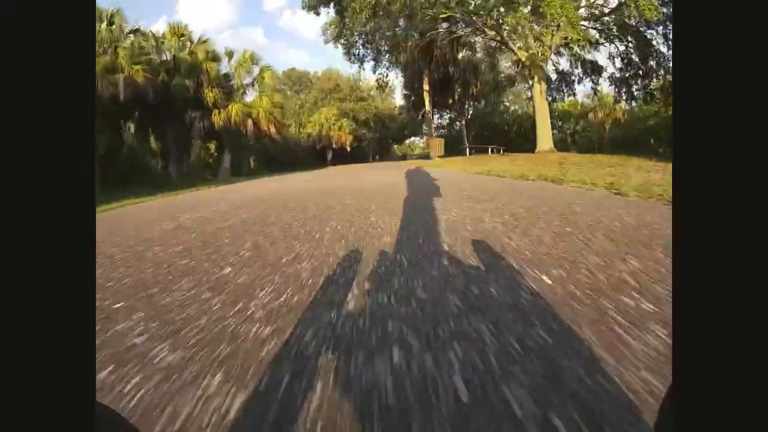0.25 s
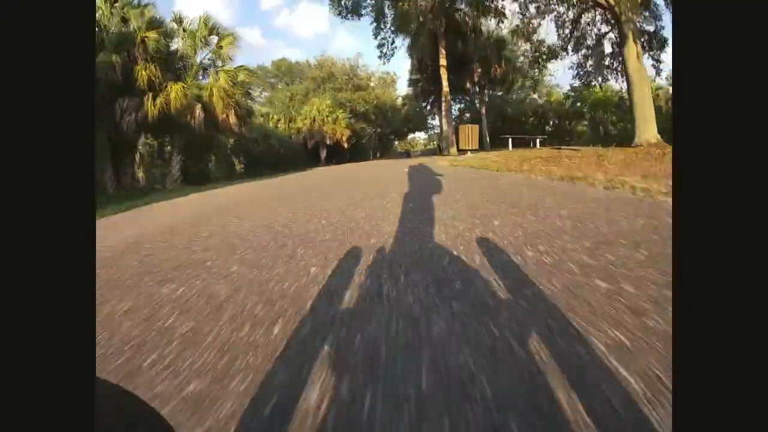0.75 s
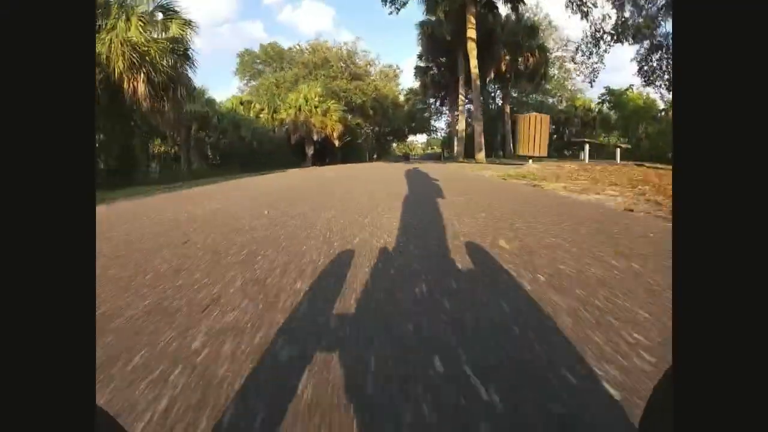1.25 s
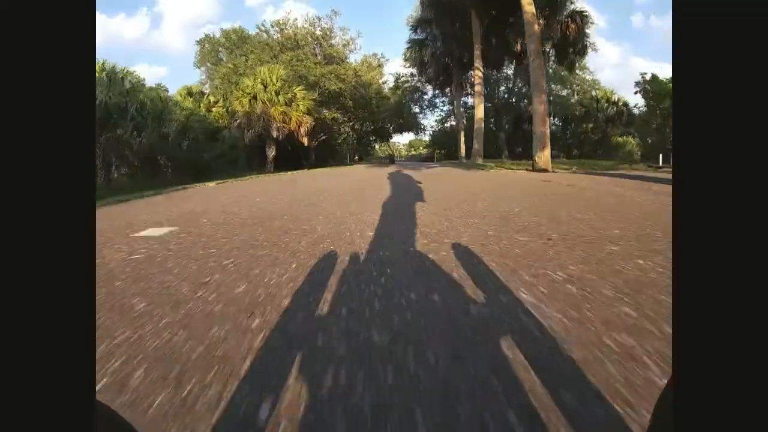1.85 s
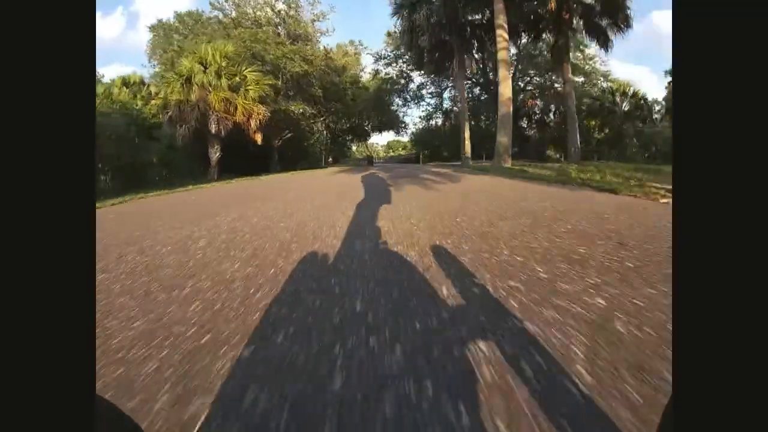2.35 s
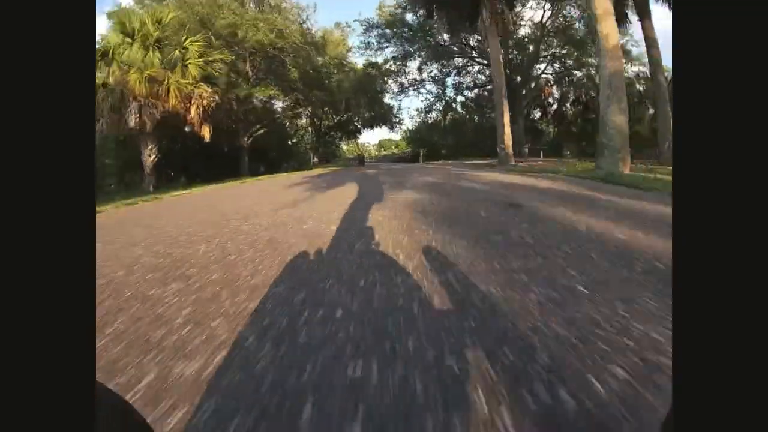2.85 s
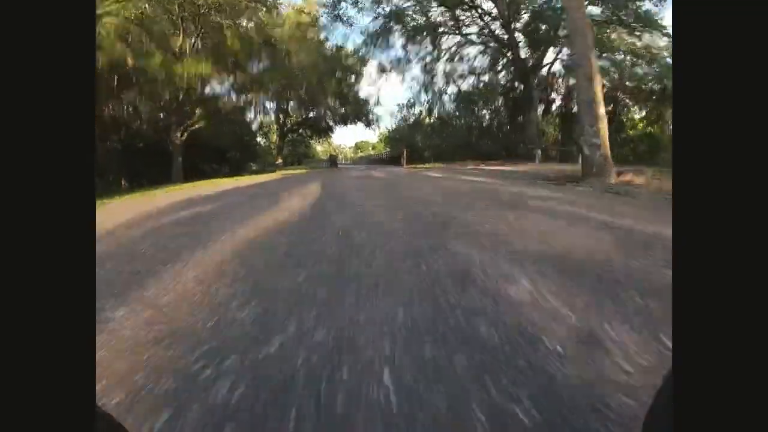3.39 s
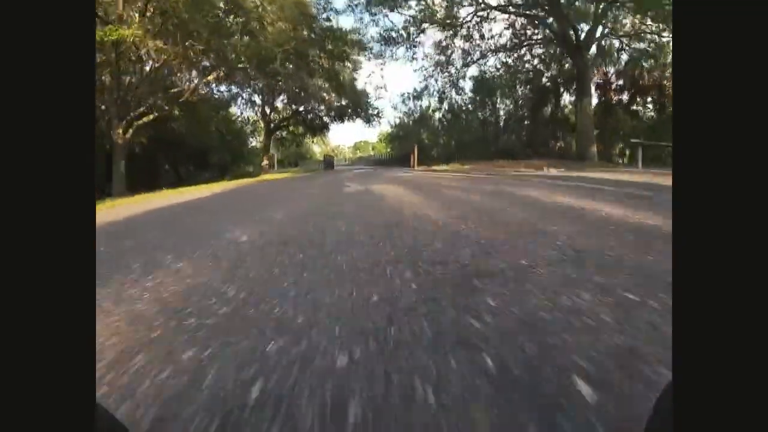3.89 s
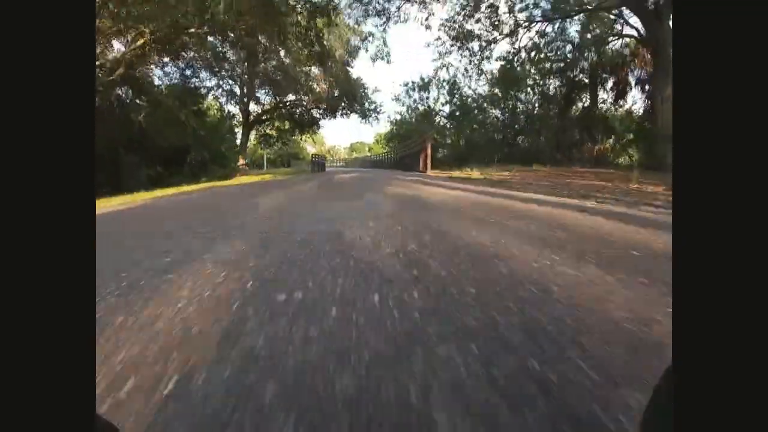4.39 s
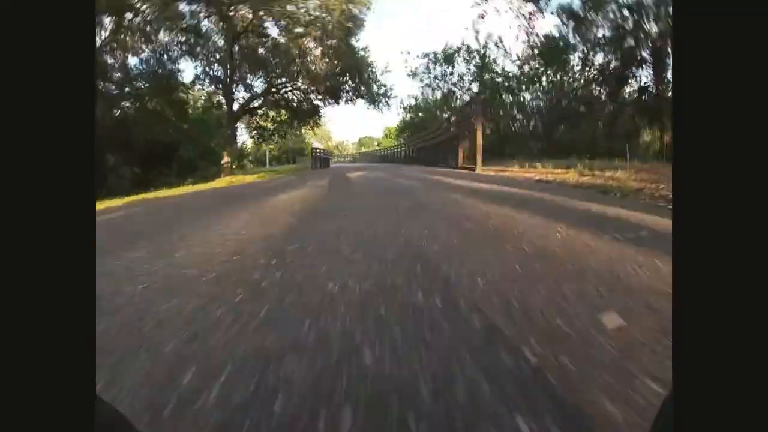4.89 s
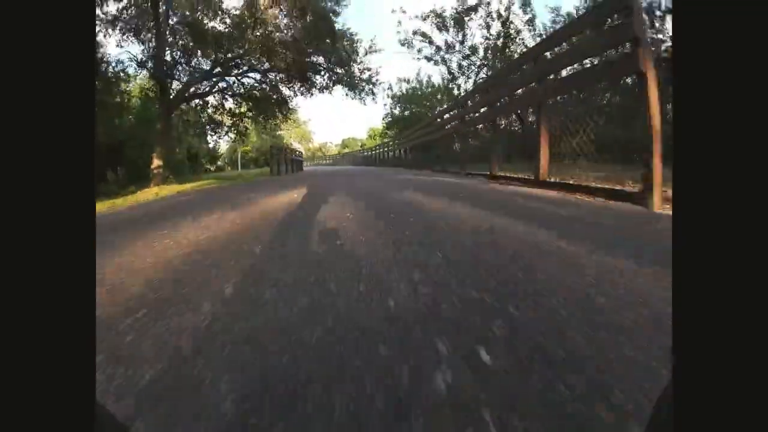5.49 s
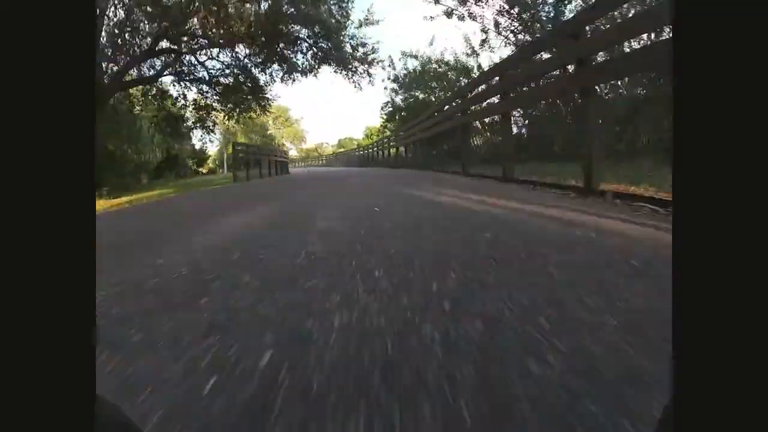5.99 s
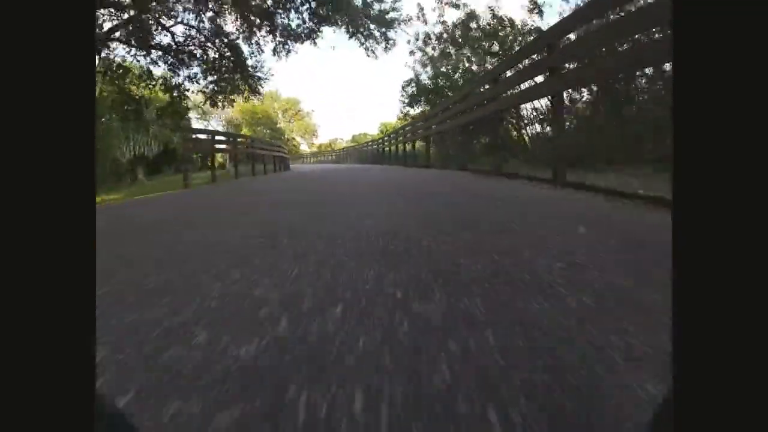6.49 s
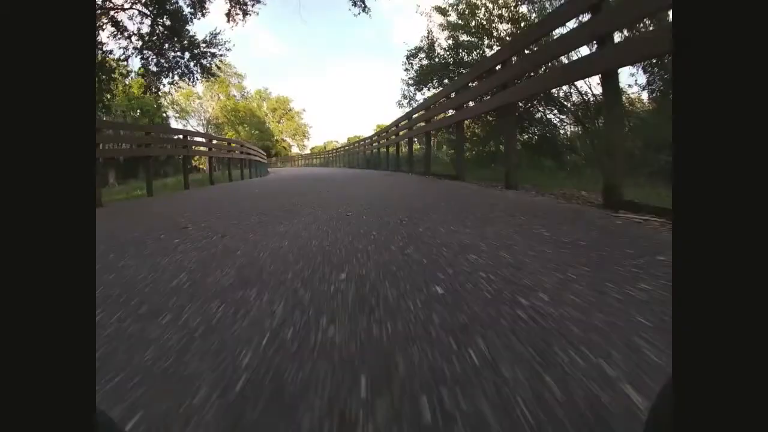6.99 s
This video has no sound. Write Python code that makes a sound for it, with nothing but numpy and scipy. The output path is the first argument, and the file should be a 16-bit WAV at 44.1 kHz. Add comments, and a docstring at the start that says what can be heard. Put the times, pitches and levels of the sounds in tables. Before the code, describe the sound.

Outdoors, very close and dry, deck-mounted sound of an electric board at speed. Deep lumpy rumble and wind buffeting lie under gritty tyre noise and small bright rattling clicks. A single hard knock comes early, a crunchy cluster of blows near the middle, and further bumps later. The electric whine, loose and faint at first, almost vanishes midway, then becomes firm, strong and slightly rising.

```python
"""An electric off-road board rolls fast over rough asphalt, heard by a microphone on its deck.
Throughout, two low modes of deck and tyres shake, the frame drones, tyres and air roar and the mount rattles.
The whine of two motors is faint at first, comes up after 1 s, sinks near 3.9 s and surges from 5 s on.
A hard bump knocks the deck at 1.4 s, a cluster from 3.4 to 3.9 s, more near 5 s and from 5.9 to 6.8 s.
Shaped noise makes the drone, roar and knocks; straying sines make the modes and the whine."""
import sys
import numpy as np
from scipy import signal
from scipy.fft import rfft, irfft
from scipy.io import wavfile
from scipy.ndimage import uniform_filter1d, minimum_filter1d, map_coordinates

SR = 44100
rng = np.random.default_rng(int(sys.argv[2]) if len(sys.argv) > 2 else 0)


def waveform_to_disk(signal):
    """Save audio, clipped to [-1, 1], as 16-bit WAV at the path in sys.argv[1]."""
    frames = np.transpose(np.atleast_2d(signal))
    scaled = np.clip(frames, -1, 1) * 32767
    samples = np.round(scaled).astype(np.int16)
    wavfile.write(sys.argv[1], SR, samples)


N = 319725

# low modes of the deck on its tyres: time_s, flex_db, bounce_db
MODE_LEVELS = [(0.0, -15, -34), (0.2, -20, -16), (0.52, -16, -24), (0.87, -19, -18.5), (3.35, -24.5, -24),
               (3.53, -13.5, -19), (3.57, -28.5, -25.5), (3.89, -12.5, -26), (4.0, -40, -25),
               (4.06, -13.5, -27), (4.66, -39, -24), (4.76, -22.5, -19), (5.49, -26, -21), (5.63, -40, -23),
               (5.88, -16, -19.5), (5.96, -47, -23), (6.0, -24.5, -31), (6.18, -23, -28), (6.58, -23, -24),
               (6.66, -31, -18), (6.82, -17, -27), (7.25, -26, -21.5)]
# pitch of the bounce on the tyres: time_s, pitch_hz
BOUNCE_PITCH = [(0, 69.9), (1.2, 67), (2.3, 62.2), (3.1, 59.42), (3.5, 68.24), (4.4, 65.46), (4.7, 62.7),
                (5.8, 61.7), (6.5, 66.3), (7.25, 65.4)]
# roughness of the asphalt, as the level of the frame drone: time_s, level_db
ROUGHNESS = [(0.0, -26), (0.3, -29), (1.27, -28.5), (1.37, -20), (1.67, -26.5), (3.39, -21.5), (3.55, -26),
             (4.58, -29.5), (4.85, -23), (5.39, -27), (5.51, -22.5), (5.79, -25.5), (5.83, -18.5),
             (6.3, -26.5), (6.56, -17), (6.64, -26), (6.78, -16.5), (6.84, -23.5), (7.25, -27)]
# level of the upper frame drone: time_s, level_db
UPPER_LEVEL = [(0, -30.5), (1, -29), (1.4, -44), (4.5, -42.5), (7.25, -41.5)]
# slow drift of the background: time_s, roar_db, rattle_db
BACKGROUND = [(0, -33, -52), (.9, -30, -48), (1.5, -31, -49.5), (3.3, -33.5, -49.5), (3.95, -30, -49),
              (4.25, -32.5, -56.5), (4.6, -37.5, -52.5), (5, -31.5, -49), (5.8, -33.5, -51.5),
              (6.4, -29.5, -46.5), (6.9, -30.5, -47.5), (7.25, -30.5, -48.5)]
# motor load, as the level of the whine before its flutter: time_s, level_db
MOTOR_LOAD = [(0, -56), (.9, -51), (1.2, -38), (1.5, -45), (1.75, -37), (3.5, -38), (3.9, -51.5),
              (4.45, -41.5), (4.65, -34), (4.88, -38), (5, -26.5), (5.1, -33), (5.35, -35.5), (5.46, -37),
              (5.51, -29), (5.71, -24.5), (5.76, -39), (5.81, -22), (5.93, -38.5), (6.0, -26.5),
              (6.17, -26.5), (6.2, -37), (6.25, -32), (6.28, -24.5), (6.45, -38.5), (6.54, -20),
              (6.6, -32.5), (6.66, -25), (6.85, -23.5), (6.89, -35.5), (6.95, -30), (7.04, -33.5),
              (7.25, -29.5)]
# motor speed, as the pitch of the whine; loose in coasting, tight under drive: time_s, pitch_hz, stray_hz
MOTOR_SPEED = [(0, 930, 45), (1.2, 950, 30), (1.7, 995, 30), (1.95, 895, 30), (2.45, 920, 35),
               (2.65, 850, 45), (3.05, 875, 50), (3.5, 815, 40), (4.3, 755, 25), (4.65, 752, 11),
               (5, 775, 8), (5.6, 782, 7), (6.1, 800, 9), (6.75, 822, 9), (7.25, 830, 11)]
# hard bumps that knock the deck: start_s, knock_db
HARD_BUMPS = [(1.388, -20), (3.437, -17), (3.495, -20.5), (3.518, -16), (3.542, -20.5), (3.79, -23),
              (3.861, -11), (3.871, -27), (3.905, -19.5), (3.915, -24), (4.944, -20.5), (4.971, -20.5),
              (4.998, -25), (5.864, -18.5), (5.932, -26), (6.263, -26), (6.515, -29.5), (6.808, -20.5),
              (6.825, -15)]
# ticks of the loose mount: start_s, bright_db, dull_db
MOUNT_TICKS = [(.1855,-39,-34),(0.208,-33,-35),(.2773,-36,-29),(0.3,-30,-32),(.341,-32,-35),(.513,-33,-34),(0.55,-37,-30),(0.5603,-26,-23),(.649,-29,-28),(0.707,-26.5,-29),(.853,-29.5,-34),(.9448,-34,-32),(0.9765,-30.5,-34),(1.0145,-34,-35),(1.1875,-37,-42),(1.246,-29.5,-34),(1.324,-34,-36),(1.378,-33,-35),(1.3877,-17.5,-22.5),(1.404,-30,-35),(1.4534,-32,-30),(1.4871,-25,-41),(1.5,-35,-35),(1.513,-29,-35),(1.5734,-31,-35),(1.6006,-30,-35),(1.7502,-25,-29),(1.863,-31,-39),(1.873,-35,-41),(1.914,-33.5,-41),(1.935,-27,-29),(1.993,-28,-31),(2.0228,-32.5,-31),(2.1356,-30,-32),(2.2017,-34,-39),(2.311,-29.5,-34),(2.429,-34,-36),(2.617,-28.5,-29),(2.6624,-35,-37),(2.7367,-37,-28.5),(2.7771,-33,-34),(2.8906,-35,-38),(2.9398,-33,-34),(3.0969,-30.5,-31),(3.1648,-34,-34),(3.2655,-30,-34),(3.347,-42,-26),(3.425,-32,-36),(3.4293,-31,-31),(3.4365,-32,-20),(3.445,-24.5,-25),(3.482,-21.5,-31),(3.495,-28,-15),(3.503,-24,-30),(3.512,-30,-34),(3.5182,-19,-19),(3.529,-29,-34),(3.551,-16.5,-22),(3.5918,-28,-31),(3.641,-23,-23),(3.7494,-34,-38),(3.7774,-34,-38),(3.7916,-33,-23),(3.8256,-36,-29),(3.8524,-31,-38),(3.8622,-22,-18),(3.865,-18,-20),(3.8714,-19,-26),(3.8996,-18.5,-21),(3.911,-23,-21),(3.915,-30,-25),(3.925,-31,-35),(3.947,-33,-27),(3.9994,-36,-39),(4.0203,-37,-34),(4.0482,-28.5,-33),(4.1266,-33,-37),(4.147,-30,-38),(4.207,-38,-43),(4.277,-30,-34),(4.3296,-40,-33),(4.4329,-39,-37),(4.4483,-35,-36),(4.5287,-35,-44),(4.8755,-36,-35),(4.9128,-30,-35),(4.93,-30,-36),(4.957,-25,-32),(4.962,-28,-33),(4.9826,-25.5,-36),(4.991,-25,-38),(4.9982,-24.5,-34),(5.0075,-29,-36),(5.069,-35,-38),(5.0876,-30,-32),(5.107,-28.5,-37),(5.1794,-33,-37),(5.1984,-32,-36),(5.223,-27.5,-32),(5.2745,-33.5,-34),(5.3737,-32,-39),(5.6621,-30.5,-36),(5.7566,-31,-35),(5.843,-31,-42),(5.8501,-27,-34),(5.937,-30,-22),(6.0392,-32,-37),(6.0642,-29,-38),(6.13,-31,-34),(6.3745,-33,-32),(6.4667,-32,-34),(6.5555,-28,-36),(6.6506,-33,-29),(6.7225,-29,-34),(6.7938,-31,-34),(6.807,-22,-24),(6.8145,-17,-26),(6.825,-28,-30),(6.8283,-23,-21),(6.8628,-24.5,-27),(6.9634,-26,-31),(7.1803,-31,-24),(7.2265,-23,-32)]

# Spectra, each a relative density over frequency.
# air buffeting the microphone: freq_hz, density_db
BUFFET_SPECTRUM = [(8, -16), (20, -21), (45, -2.5), (80, 1), (100, -7.5), (130, -9.5), (170, -12.5),
                   (220, -13), (400, -72), (1000, -120)]
# drone of the frame: freq_hz, density_db
FRAME_SPECTRUM = [(100, -41.5), (170, -8.5), (189, -14.5), (237, -1), (262, -1.5), (295, -3.5), (338, -8),
                  (367, -18), (400, -13), (520, -46.5), (880, -120)]
# upper drone of the frame: freq_hz, density_db
UPPER_SPECTRUM = [(200, -48), (280, -2.5), (340, 1.5), (400, -5), (520, -33), (900, -120)]
# roar of the tyres: freq_hz, density_db
ROAR_SPECTRUM = [(200, -37.5), (330, -1), (400, -1.5), (460, -3.5), (550, -1), (700, -6), (850, -7.5),
                 (1050, -15), (1300, -19.5), (2000, -58.5), (4000, -120)]
# air rushing past: freq_hz, density_db
RUSH_SPECTRUM = [(590, -25), (1000, -8.5), (1160, -5.5), (1620, -0.5), (1880, -8), (2130, 0), (2280, 0.5),
                 (2720, -3.5), (3270, -14.5), (3540, -28), (4600, -23.5), (7790, -120)]
# hiss of the loaded drive: freq_hz, density_db
DRIVE_SPECTRUM = [(650, -26.5), (1100, -31.5), (1350, -1.5), (1480, -10), (1620, -0.5), (1780, 0),
                  (1950, -5.5), (2200, -22), (2730, -39), (4620, -120)]
# knock of the deck: freq_hz, density_db
KNOCK_SPECTRUM = [(120, -4.5), (280, 14.5), (500, 14.5), (800, 16.5), (1100, 5.5), (1600, -0.5),
                  (2300, -3.5), (3500, -9.5), (6000, -27), (9000, -120)]
# dull part of the ticks, and the crunch of broken asphalt: freq_hz, density_db
CLAMP_SPECTRUM = [(900, -16.5), (1800, -7), (3100, -2.5), (3700, -8), (4500, -11.5), (6000, -25),
                  (9000, -53), (14000, -120)]
# bright part of the ticks, and tiny contacts: freq_hz, density_db
MOUNT_SPECTRUM = [(3000, -15.5), (4200, -3.5), (5000, -1.5), (5400, -1), (6100, 1), (7100, -10.5),
                  (8000, -9), (9000, -12.5), (10000, -20.5), (11500, -27), (13000, -32.5), (15300, -61),
                  (18000, -120)]
# gritty hiss of the mount: freq_hz, density_db
GRIT_SPECTRUM = [(2500, 7), (3500, 15), (4300, 7), (4800, 10), (5400, 7), (6200, 6), (7100, -7),
                 (8400, -8.5), (9200, -22), (10000, -9), (11500, -31.5), (13000, -33), (15300, -77),
                 (18000, -120)]
# high narrow-band hiss, about 8 kHz: freq_hz, density_db
HIGH_HISS_SPECTRUM = [(7000, -61), (7800, 8), (8500, 1.5), (9100, -9.5), (9900, -9.5), (11000, -18.5),
                      (13000, -37.5), (16000, -120)]

FLEX_HZ = 42  # centre of the straying flex pitch
FULL_HZ = 900  # whine pitch against which speed is reckoned
TOP_HZ = 15375  # band limit
ROAR_ROAD, RUSH_ROAD, RATTLE_ROAD = 0.093, 0.11, 0.23  # shares of the road's dB swings
RUSH_DB, RUSH_SPEED = -36, 42  # base level; dB per tenfold speed
DRIVE_DB, DRIVE_LOAD = -47, 0.85  # hiss level at a whine of -40.5 dB; share of the load's dB swings
BREAK_DB, BREAK_PER_S = 4.5, 36  # depth and rate of the random dips in the whine
SMALL_PER_S, SMALL_DB, SMALL_DULL_DB = 14, -39.5, 2.5  # lesser ticks: rate; mid level; dull over bright
TILT, PIVOT_HZ = 0.55, 5500  # how far the brightness of a tick strays; where its level stays put
HIGH_HISS_DB = -22  # relative to the grit, away from the bumps
CRUNCH_DB = -39.5
# broken asphalt about each bump: Gaussian half-width before saturation, s; level changes there, dB
PATCH_S = 0.013
PATCH_ROAR_DB, PATCH_RATTLE_DB, PATCH_HIGH_HISS_DB, PATCH_WHINE_DB = -0.5, 4.5, 14, 1


def amp(db):
    """Decibels to amplitude, by the definition of level."""
    return 10 ** (np.asarray(db) / 20)


def unit(x):
    """Normalisation to unit rms, so that levels can be set separately."""
    return x / np.sqrt(np.mean(x ** 2) + 1e-20)


def curves(rows):
    """Linear interpolation in time: one value per sample for each column after the first."""
    s, *cols = np.transpose(rows)
    return [np.interp(np.arange(N) / SR, s, c) for c in cols]


def wobble(rate):
    """Band-limited randomness: a spline through Gaussian knots, rate of them a second."""
    knots = rng.standard_normal(int(N * 400 / SR) + 4)
    return map_coordinates(knots, [np.arange(N) * np.clip(rate, 0.1, 399) / SR])


def coloured(x, points):
    """Minimum-phase filtering: the spectrum shapes x causally, and white noise keeps its rms."""
    m = 2 ** 15
    hz, db = np.transpose(points)
    log_hz = np.log(np.fft.rfftfreq(m, 1 / SR) + 1)
    gain = unit(amp(np.interp(log_hz, np.log(hz + 1), db)))
    # folding the cepstrum onto positive times makes the response causal
    cepstrum = irfft(np.log(gain + 1e-6), m)
    cepstrum[1:m // 2] *= 2
    cepstrum[m // 2 + 1:] = 0
    response = irfft(np.exp(rfft(cepstrum)), m)
    return signal.fftconvolve(x, response)[:N]


def rush(points, patchy_db, lumps_db, rate):
    """Turbulent noise of unit rms: random patches in time and frequency, and a lumpy overall level."""
    z = signal.stft(rng.standard_normal(N + 512), nperseg=512)[2]
    field = uniform_filter1d(rng.standard_normal(z.shape), size=5, axis=0)
    field = uniform_filter1d(field, size=8, axis=1)
    noise = signal.istft(z * amp(patchy_db * unit(field)), nperseg=512)[1][:N]
    return unit(coloured(noise * amp(lumps_db * wobble(rate)), points))


def waver(hz, stray_hz, flutter_db, rate):
    """Frequency and amplitude modulation: a sine of unit rms strays at random in pitch and level."""
    cycles = np.cumsum(hz + stray_hz * wobble(rate)) / SR
    phase = 2 * np.pi * (cycles + rng.random())
    return unit(amp(flutter_db * wobble(rate)) * np.sin(phase))


def burst(n, t60):
    """Exponential decay: a puff of noise starts at unit rms and falls 60 dB in t60 seconds."""
    fade = amp(-60 * np.arange(n) / SR / t60)
    puff = rng.standard_normal(n) * fade
    return puff * np.linalg.norm(fade) / np.linalg.norm(puff)


def pace():
    """Forcing by the road: roughness about its mean in dB, and speed as log10 of its ratio to FULL_HZ."""
    road_db, hz = curves(ROUGHNESS)[0], curves(MOTOR_SPEED)[0]
    return road_db - road_db.mean(), np.log10(hz / FULL_HZ)


def patches():
    """Saturating excitation: rises towards 1 on the broken asphalt around a bump, 0 elsewhere."""
    t = np.arange(0, N / SR + 0.002, 0.001)
    near = sum(np.exp(-((t - s) / PATCH_S) ** 2) * amp(db + 15) for s, db in HARD_BUMPS)
    return np.interp(np.arange(N) / SR, t, np.tanh(2 * near))


def deck():
    """Modal vibration: the road keeps the flexing of the deck and its bounce on the tyres going."""
    flex_db, bounce_db = curves(MODE_LEVELS)
    flex = waver(np.full(N, FLEX_HZ), stray_hz=5, flutter_db=3.2, rate=22)
    bounce = waver(curves(BOUNCE_PITCH)[0], stray_hz=3.475, flutter_db=-0.5, rate=24)
    return amp(flex_db) * flex + amp(bounce_db) * bounce


def rolling():
    """Roughness excitation: asphalt grain drives frame drone, tyre roar and air rush with shared lumps."""
    road, speed = pace()
    lumps = wobble(24)
    frame_db = curves(ROUGHNESS)[0] + 0.8 * lumps + 0.7 * wobble(9)
    frame = amp(frame_db) * rush(FRAME_SPECTRUM, patchy_db=0.5, lumps_db=0.5, rate=24)
    upper_db = curves(UPPER_LEVEL)[0] + 0.52 * lumps
    upper = amp(upper_db) * rush(UPPER_SPECTRUM, patchy_db=1.0, lumps_db=-2.5, rate=13)
    roar_db = curves(BACKGROUND)[0] + ROAR_ROAD * road + PATCH_ROAR_DB * patches() + lumps
    roar = amp(roar_db) * rush(ROAR_SPECTRUM, patchy_db=1.5, lumps_db=0.26, rate=27)
    air_db = RUSH_DB + RUSH_ROAD * road + RUSH_SPEED * speed + 0.092 * lumps
    air = amp(air_db) * rush(RUSH_SPECTRUM, patchy_db=0.5, lumps_db=0.57, rate=50)
    return frame + upper + roar + air


def motors():
    """Tonal whine at a pitch set by motor speed: one motor firm, the other weaker, looser and 8 Hz above."""
    hz, stray_hz = curves(MOTOR_SPEED)
    firm = waver(hz, stray_hz=stray_hz, flutter_db=2, rate=70)
    loose = 0.55 * waver(hz + 8, stray_hz=4 * stray_hz, flutter_db=3, rate=90)
    dips_db = BREAK_DB * np.abs(wobble(BREAK_PER_S))
    whine_db = curves(MOTOR_LOAD)[0] + PATCH_WHINE_DB * patches() - dips_db + 0.38 * wobble(21)
    return amp(whine_db) * (firm + loose)


def drive_hiss():
    """Load-dependent noise: the drive hisses near twice the whine's pitch, following the smoothed load."""
    load_db = uniform_filter1d(curves(MOTOR_LOAD)[0], size=SR // 2)
    level_db = DRIVE_DB + DRIVE_LOAD * (load_db + 40.5) + 0.5 * wobble(4.23)
    return amp(level_db) * rush(DRIVE_SPECTRUM, patchy_db=2.3, lumps_db=-0.5, rate=24)


def bumps():
    """Impact response: cracks in the road shake the deck into short, grainy, decaying knocks."""
    knocks = np.zeros(N + 2500)
    rise = 1 - np.exp(-np.arange(2500) / SR / 0.001)
    for s, db in HARD_BUMPS:
        knocks[round(s * SR):][:2500] += amp(db) * rise * burst(2500, t60=0.06)
    return coloured(knocks[:N] * amp(1.05 * wobble(300)), KNOCK_SPECTRUM)


def crunch():
    """Granular noise: broken asphalt around each bump crunches, its level broken up very fast."""
    grains = rush(CLAMP_SPECTRUM, patchy_db=5.5, lumps_db=5.5, rate=380)
    return amp(CRUNCH_DB) * patches() * grains


def rattle_level():
    """Forced rattle: its level in dB follows the drift, the roughness and the broken asphalt."""
    return curves(BACKGROUND)[1] + RATTLE_ROAD * pace()[0] + PATCH_RATTLE_DB * patches()


def lesser_ticks():
    """Poisson arrivals: small ticks with exponential waits, the bright parts following the rattle level."""
    draws = rng.random((200, 3))
    when = np.cumsum(-np.log(1 - draws[:, 0])) / SMALL_PER_S
    swing_db = rattle_level()
    swing_db = swing_db - swing_db.mean()
    small = []
    for s, (a, b) in zip(when, draws[:, 1:]):
        if s < N / SR:
            bright_db = SMALL_DB + swing_db[int(s * SR)] + 12 * (a - 0.5)
            dull_db = SMALL_DB + SMALL_DULL_DB + 10 * (b - 0.5)
            small.append((s, bright_db, dull_db))
    return small


def tilted(x):
    """First-order spectral tilt: x turns brighter or duller at random, its level kept at the pivot."""
    c = rng.uniform(-TILT, TILT)
    pivot_gain = abs(1 + c * np.exp(-2j * np.pi * PIVOT_HZ / SR))
    return np.convolve(x, [1, c])[:len(x)] / pivot_gain


def ticks():
    """Contact impacts: loose parts of the mount tick with a bright and a dull part, each leaving a buzz."""
    bright, dull = np.zeros(N + 1500), np.zeros(N + 1500)
    rise = np.minimum(np.arange(1500) / SR / 0.0016, 1) ** 2
    for s, bright_db, dull_db in MOUNT_TICKS + lesser_ticks():
        # a fast decay, then a faint buzz as the part settles
        click = burst(1500, t60=rng.uniform(0.006, 0.011))
        tick = rise * (click + 0.02 * burst(1500, t60=0.07))
        tick = 3.7 * tilted(tick) / np.linalg.norm(tick)
        thud = np.sqrt(rise) * (2.37 * burst(1500, t60=0.0093) + 0.2 * burst(1500, t60=0.041))
        bright[round((s - 0.0005) * SR):][:1500] += amp(bright_db) * tick
        dull[round(s * SR):][:1500] += amp(dull_db) * thud
    return coloured(bright[:N], MOUNT_SPECTRUM) + coloured(dull[:N], CLAMP_SPECTRUM)


def chatter():
    """Shot noise: tiny contacts in random bunches, a few far harder, over grit and a hiss about 8 kHz."""
    chance, size = rng.random(N), rng.exponential(1, N)
    rate = 130 * amp(5 * wobble(12))  # contacts per second
    hits = (chance < rate / SR) * amp(5 * np.minimum(size, 2))
    decay = amp(-60 * np.arange(600) / SR / 0.005)
    grains = signal.fftconvolve(hits, decay)[:N] * rng.standard_normal(N)
    contacts = 0.22 * unit(coloured(grains, MOUNT_SPECTRUM))
    # the narrow-band hiss swells around the bumps
    high_hiss_db = HIGH_HISS_DB + PATCH_HIGH_HISS_DB * patches()
    high_hiss = amp(high_hiss_db) * rush(HIGH_HISS_SPECTRUM, patchy_db=6.0, lumps_db=6.5, rate=25)
    grit = rush(GRIT_SPECTRUM, patchy_db=1.0, lumps_db=1.7, rate=52)
    return amp(rattle_level()) * (high_hiss + contacts + grit)


def buffeting():
    """Turbulent pressure: air buffets the microphone as low, lumpy noise."""
    return amp(-23.5) * rush(BUFFET_SPECTRUM, patchy_db=1.0, lumps_db=1.5, rate=20)


def scene():
    """Superposition: the pressures of all sources add."""
    vehicle = deck() + rolling() + motors() + drive_hiss()
    impacts = bumps() + crunch() + ticks()
    return (vehicle + impacts + chatter() + buffeting())[None]


def record(dry):
    """Limiting and band limitation: gain drops around peaks over a ceiling; nothing passes TOP_HZ."""
    need = np.minimum(1, amp(-4.2) / (np.abs(dry) + 1e-9))
    gain = uniform_filter1d(minimum_filter1d(need, size=900, axis=1), size=700, axis=1)
    held = dry * gain
    # the mirrored copy keeps the ends continuous for the transform
    both = np.hstack([held, held[:, ::-1]])
    passband = np.fft.rfftfreq(2 * N, 1 / SR) < TOP_HZ
    return irfft(rfft(both) * passband, 2 * N)[:, :N]


dry = scene()
out = record(dry)
waveform_to_disk(out)
```